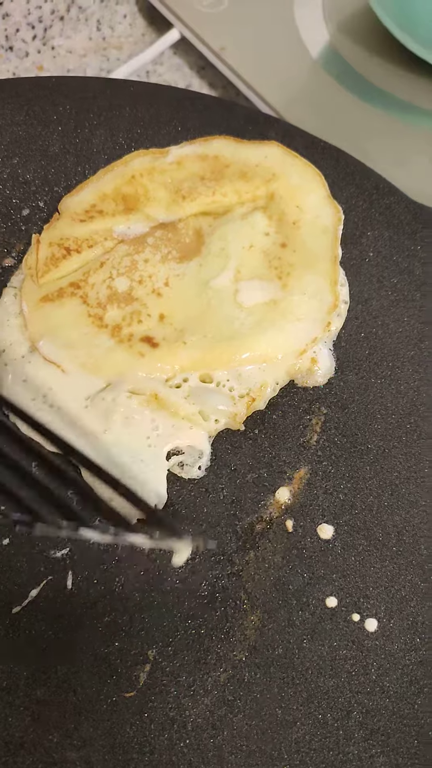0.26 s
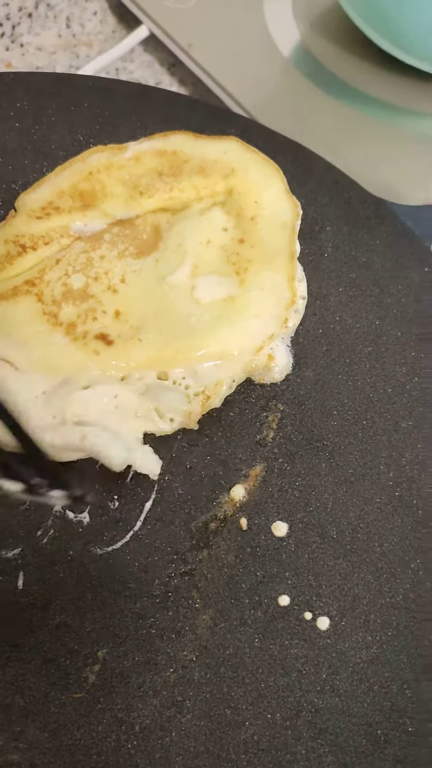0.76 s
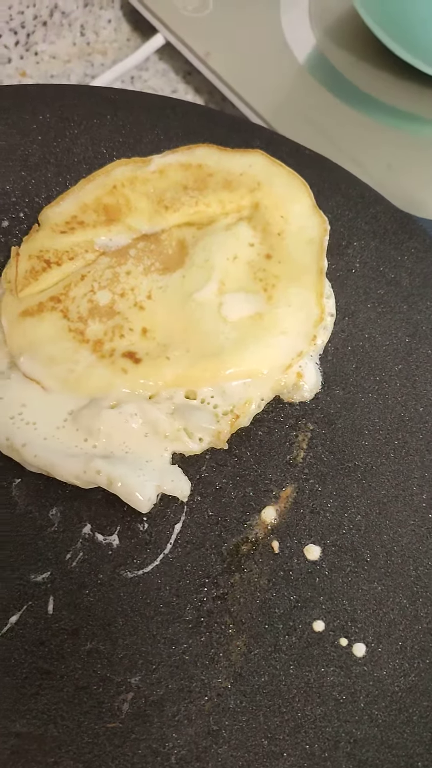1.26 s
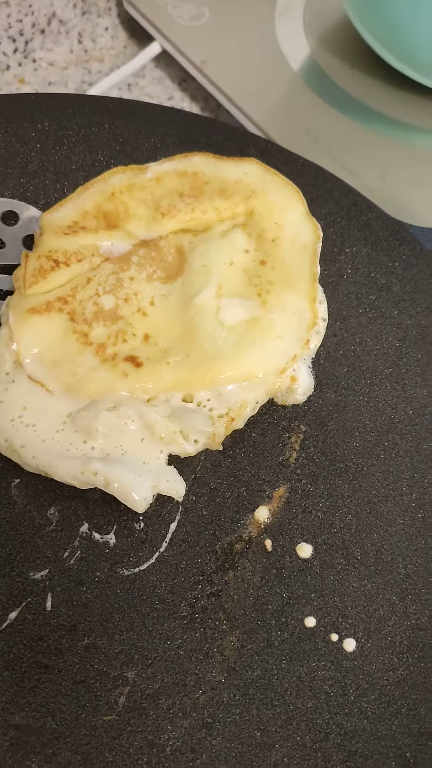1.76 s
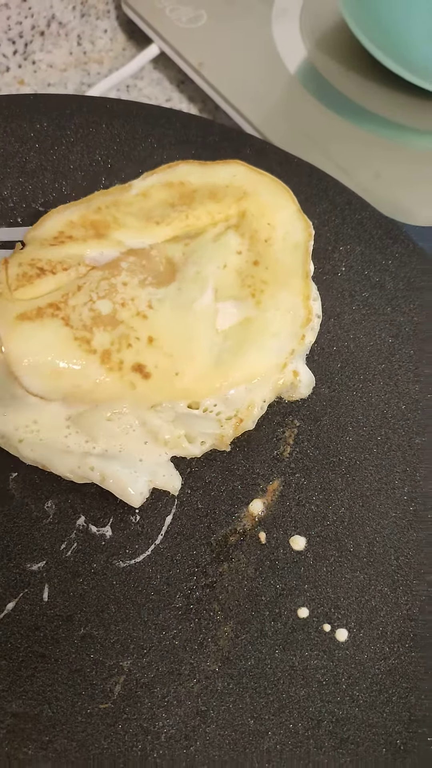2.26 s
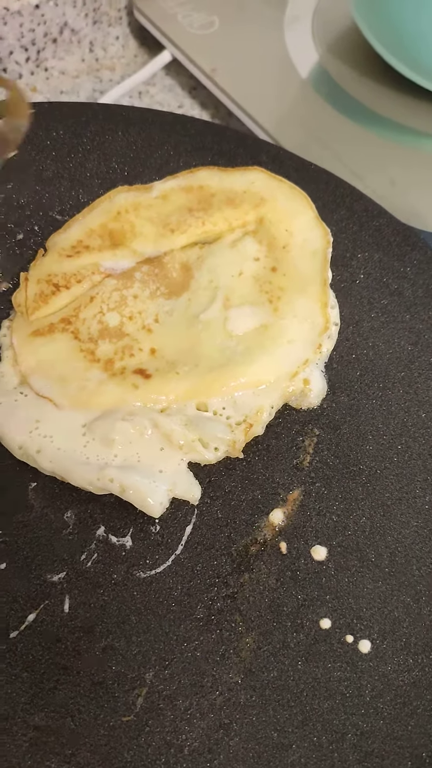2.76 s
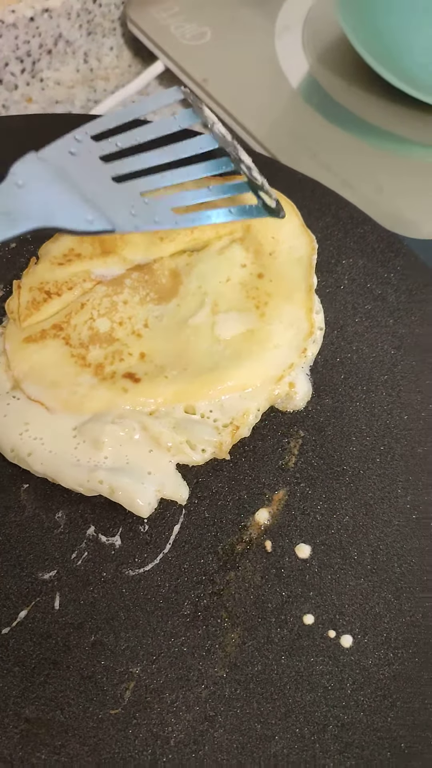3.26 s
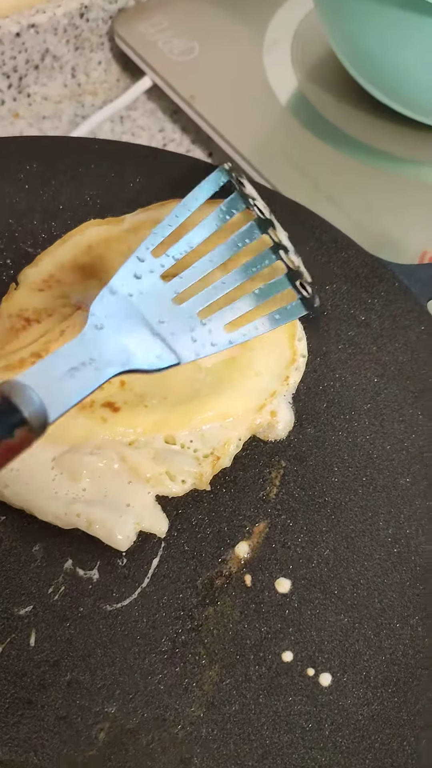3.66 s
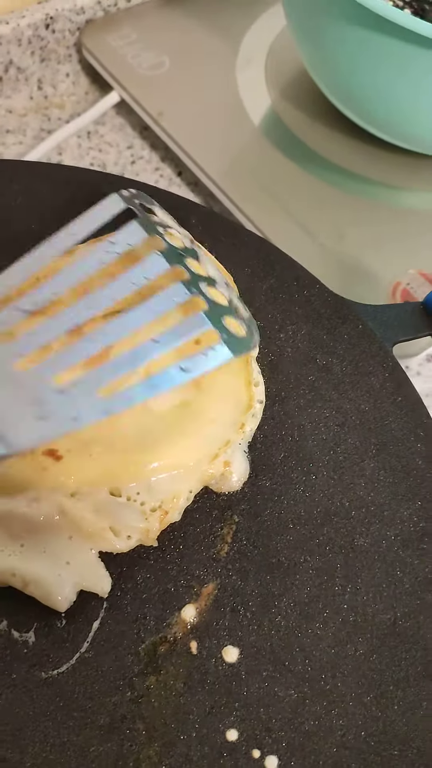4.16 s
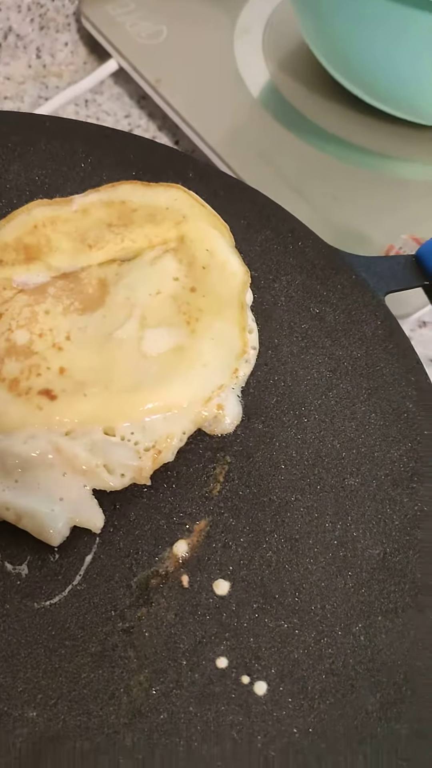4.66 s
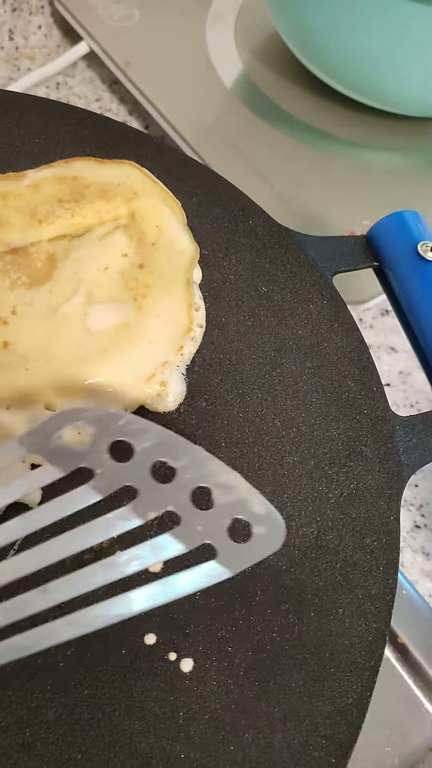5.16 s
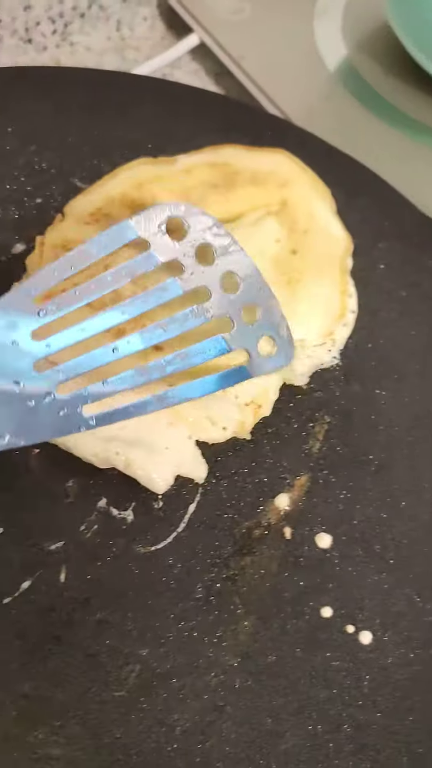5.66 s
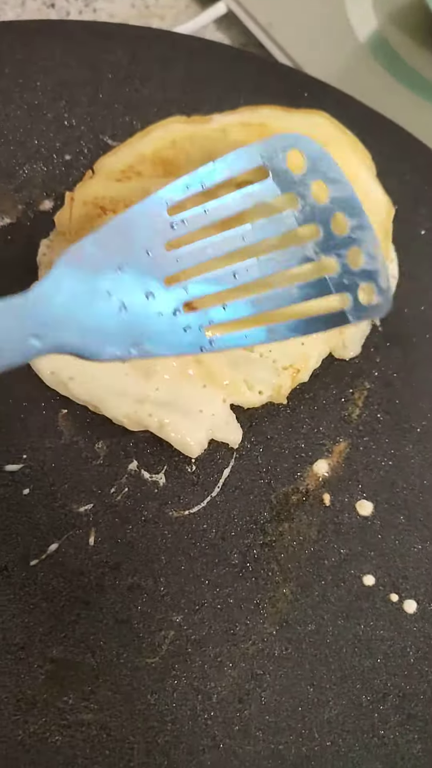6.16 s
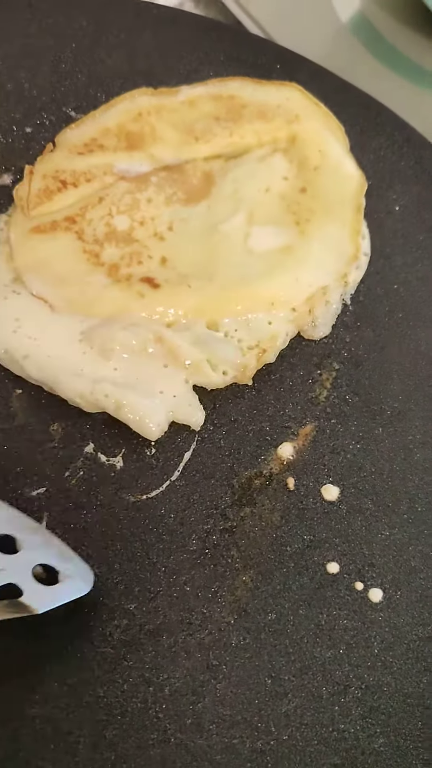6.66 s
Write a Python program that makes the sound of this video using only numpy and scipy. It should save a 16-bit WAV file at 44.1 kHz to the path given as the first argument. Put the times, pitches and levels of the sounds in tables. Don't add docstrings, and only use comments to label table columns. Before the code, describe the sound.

A small kitchen, heard very close in stereo, with a low soft rumble behind. Batter sizzles in a flat pan: a bright, airy hiss, strongest in the first three seconds, scattered throughout with sharp steam pops and thin fat spits, many leaning right. A brief spatula scrape opens; at 0.46 s a hard cracking knock runs into a short scrape at 0.55. Faint rubbing passes around 1.3-2.1 s, with a brisk cluster of spits near 0.9-1.2. A faint knock at 2.47 leads to small scratches until 2.7. Pops stay busy to 3.6 as the hiss thins. Two loud, flat steel clanks ring briefly at 3.73 and 4.06. After quieter crackling, light metallic taps come at 5.43, 5.95 and 6.21, with a quick double brushing stroke around 5.6. A dry knock at 6.77 and short scrape at 6.88 end it as the sizzle flares sharply.

```python
import sys
import numpy as np
from scipy import signal
from scipy.io import wavfile
from scipy.ndimage import uniform_filter1d

SR = 44100
rng = np.random.default_rng(int(sys.argv[2]) if len(sys.argv) > 2 else 0)


def rack_gain(trim_db):
    fader = np.asarray(trim_db, float)
    return 10 ** (fader / 20)


def materialize(psi):
    bounded = np.clip(np.atleast_2d(psi).T, -1, 1)
    quanta = np.round(bounded * 32767).astype(np.int16)
    wavfile.write(sys.argv[1], SR, quanta)


N = 304279
SIDES = np.array([[.5], [-.5]])
STEADY_TOP_HZ = 14350

# (time [s], hiss level [dB])
FRY_VIGOUR = [(0.0, -50), (0.42, -55), (0.5, -51), (0.77, -49), (0.96, -54.5), (2.04, -53), (2.25, -56.5),
              (2.86, -54), (3.57, -58.5), (4.42, -62.5), (4.75, -59), (4.96, -62.5), (5.2, -60.5),
              (6.07, -64.5), (6.47, -65), (6.78, -66), (6.83, -54.5), (6.9, -47)]
# (frequency [Hz], density [dB per Hz])
HISS_SPECTRUM = [(530, -36), (900, -5.5), (1300, -15), (1680, -5.5), (2000, -4.5), (2960, -4), (3450, 0),
                 (4550, -5), (7570, 1.5), (9540, -13), (12700, -3.5), (14300, -8)]


def fry():
    hiss_db, = in_time(FRY_VIGOUR)
    mean_hiss_db = -63
    top_db = 1.45 + 0.23 * (hiss_db - mean_hiss_db)
    clicks = grains(300 * rack_gain(4.5 * drift(6)), spread_db=0.5)
    burst = signal.lfilter([1], [1, -.93], np.abs(clicks))
    white = rng.standard_normal((2, 2, N)) * (1.0 + 0.5 * rms_one(burst)) * rack_gain(1.9 * drift(45))
    return rack_gain(hiss_db - 2) * coloured(white, HISS_SPECTRUM, 912, count=13, patchy_db=1.5, top_db=top_db)


# (time [s], peak level [dB], left-right [dB])
STEAM_POPS = [(0.415, -32, -4.5), (1.0064, -27, 2), (1.5452, -27.5, -3), (1.7427, -29, 0), (1.801, -43, 23),
              (1.9164, -43, 8), (2.0692, -27, -4.5), (2.2928, -30, 2), (2.351, -27, 0), (2.7666, -25.5, 3),
              (2.8605, -34, 4), (2.8875, -27, -2), (2.9452, -25.5, -7), (3.0899, -33, 0), (3.1392, -32, 6),
              (3.2274, -30, -1.5), (3.327, -25.5, -2), (3.3664, -32.5, -4.0), (3.4353, -29, -2),
              (3.5905, -32.5, -6), (3.8172, -33, -11), (4.0133, -34, -9), (4.114, -28, -11),
              (4.2707, -32, -9), (4.4067, -28, 3), (4.4996, -29.5, 2), (4.9305, -30.5, 4),
              (5.238, -29, -3.5), (5.2695, -30, -8), (5.306, -31, -1.5)]
# (time [s], peak level [dB], left-right [dB])
FAT_SPITS = [(0.2272, -31.5, -7), (0.8033, -29, -7.0), (0.8978, -24.5, -9), (0.9376, -28, -7.5),
             (0.9532, -27.5, -6.5), (0.9818, -26.5, -8), (1.2007, -22.5, -5.5), (1.2306, -33, -12),
             (1.378, -29, -5.0), (1.6586, -26.5, -4), (1.6846, -28.5, -6), (2.09, -29.5, -6),
             (2.6724, -33, -3), (3.918, -23, -9), (3.9614, -39, -33), (4.337, -24.5, -7.5),
             (4.4416, -35, -4.0), (4.8217, -31, -4), (4.9915, -31, 0), (5.1741, -36, -4.5),
             (5.8817, -26.5, -3.0), (6.0003, -38, -7), (6.014, -34, -2.5), (6.1659, -33, -3.5),
             (6.3189, -29, -5), (6.4, -36.5, -9), (6.5176, -37.5, -2), (6.6892, -31.5, -6.5),
             (6.831, -36, -15), (6.8761, -29, -11)]


def bursts():
    faint_count, snap_trim_db = 30, 4.5
    chance = rng.standard_normal((faint_count, 2))
    moments = rng.random(faint_count) * N / SR
    faint = [(s, -41 + 4.0 * a, -12, -7 + 4 * b) for s, (a, b) in zip(moments, chance)]
    steam = [(s, db + snap_trim_db, -12, pan) for s, db, pan in STEAM_POPS]
    fat = [(s, db + snap_trim_db, -21, pan) for s, db, pan in FAT_SPITS]
    slaps = [(s, db - 16, 10, -4) for s, db, *_ in LIGHT_TAPS + FLAT_CLANKS]
    return faint + steam + fat + slaps


def pops():
    bright, body = np.zeros((2, 2, N + 999))
    t, rows = np.arange(900) / SR, bursts()
    noise, lasting = rng.standard_normal((len(rows), 3, 900)), rng.random((len(rows), 2))
    for (s, peak_db, body_db, pan_db), (both, *own), (long, full) in zip(rows, noise, lasting):
        shape = np.exp(-t / (0.0001 + 0.0003 * long)) + 0.07 * np.exp(-t / 0.016)
        spit = shape * (0.24 * both + .5 * np.array(own))
        steepest = np.abs(np.diff(spit.mean(0))).max()
        spit = rack_gain(peak_db + SIDES * pan_db) * spit / steepest
        at = round((s + 0.001006) * SR)
        bright[:, at:at + 900] += spit
        body[:, at:at + 900] += spit * rack_gain(body_db + 9 + 3.0 * (2 * full - 1))
    return (band(bright, 3670, 16400) + band(body, 860, 6200))[:, :N]


# (time [s], peak [dB], low modes [dB], high modes [dB], crack [dB])
FLAT_CLANKS = [
    (3.725, -19.5, 3.5, -4.5, -24),
    (4.061, -16, 1.5, 1.4, 12),
]
# (frequency [Hz], level [dB], t60 [s])
STRUCK_MODES = [(298, -46, 0.9), (377, -19.5, 0.34), (406.4, -37, 0.84), (464, -50, 0.05),
                (512.5, -19, 0.24), (680, -7.5, 0.036), (783, -19, 0.079), (1060, -2, 0.028),
                (1353, -16.5, 0.13), (1830, -63, 0.077), (1918, 4, 0.049), (2144, 2.5, 0.055),
                (2565, -18, 0.27), (2600, -42, 0.12), (3189, -6, 0.08), (3903, -12.5, 0.17),
                (3900, -44, 0.16), (4673, -4.5, 0.037), (5600, -12.5, 0.06), (6940, -42, 0.054)]


def clanks():
    hit = blows(FLAT_CLANKS, STRUCK_MODES, trim_db=-10, chatter_s=0.0048, rasp_hz=(400, 5000), hardness=1.29)
    hit += clatter(FLAT_CLANKS, level_db=-20, t60=0.29, low_hz=450, high_hz=5500)
    return hit + clatter(FLAT_CLANKS, level_db=-15.5, t60=0.37, low_hz=294, high_hz=1280)


# (time [s], peak [dB], low modes [dB], high modes [dB], crack [dB])
LIGHT_TAPS = [
    (5.431, -27, -6, 1.7, 3.6),
    (5.951, -34, -5, 2.2, 1.9),
    (6.206, -30, -2.5, 3.9, 3.6),
]
# (frequency [Hz], level [dB], t60 [s])
FREE_MODES = [(355, -21, .12), (497, -18, .07), (716, -14, .06), (1100, -16, .06), (1335, -21, .07),
              (2170, -14, .05), (2740, -10, .05), (2980, -11, .05), (3210, -9, .09), (3520, -14, .05),
              (3950, -16, .09), (4700, -13, .05), (5658, -10, .07), (6680, -16, .05), (6950, -18, .05),
              (7360, -20, .05), (7740, -17, .06), (8870, -24, .05)]


def taps():
    hit = blows(LIGHT_TAPS, FREE_MODES, trim_db=-5.5, chatter_s=0.0065, rasp_hz=(1500, 9000), hardness=0.99)
    return hit + clatter(LIGHT_TAPS, level_db=-10, t60=0.13, low_hz=490, high_hz=7600)


# (middle [s], length [s], level [dB], low modes [dB], rasp [dB])
CRUST_SWEEPS = [
    (5.585, 0.081, -44.5, 6.5, 3.7),
    (5.637, 0.093, -41, 7.5, 6.9),
]


def sweep():
    return drag(CRUST_SWEEPS, FREE_MODES, trim_db=-18.5, high_db=4.5, per_s=4500, rasp_hz=(600, 7500),
                damping=2.4, stutter_db=1.5, grit_db=22.0)


# (time [s], peak [dB], low modes [dB], high modes [dB], crack [dB])
PRESSED_KNOCKS = [
    (.4635, -23, 0.5, -10, 19),
    (2.468, -35.5, -0.5, 23, -5),
    (6.767, -30.5, -13.5, -2, 1.5),
]
# (frequency [Hz], level [dB], t60 [s])
PRESSED_MODES = [(355, -15, .12), (500, -13, .05), (660, -2.5, .04), (790, -6, .05), (1000, -15, .025),
                 (1770, -14, .04), (1950, -7, .03), (2170, 0, .045), (2350, -2, .04), (2810, -8, .04),
                 (3000, -8, .04), (3560, -19, .025), (3970, -22, .025), (4810, -25, .02)]


def knocks():
    return blows(PRESSED_KNOCKS, PRESSED_MODES, trim_db=-13, chatter_s=0.017, rasp_hz=(1700, 3500),
                 hardness=1.0)


# (middle [s], length [s], level [dB], low modes [dB], rasp [dB])
EDGE_SCRAPES = [(.045, 0.091, -44.5, 5, 12), (.548, 0.061, -31, -6, -7), (1.33, 0.14, -60, 1.5, -10),
                (1.49, 0.17, -45.5, -4, 6), (1.75, 0.29, -72, 16.5, -3), (1.95, 0.15, -56.5, -2, -11),
                (2.06, .12, -67, 11, -12), (2.55, 0.085, -62, 16.5, 22), (2.625, 0.087, -49, -1, 19.5),
                (2.68, 0.042, -39, -13.5, -17), (5.17, 0.076, -60, -2, 2), (6.88, 0.088, -43.5, -7, -8)]


def scrapes():
    return drag(EDGE_SCRAPES, PRESSED_MODES, trim_db=-25, high_db=12.0, per_s=2200, rasp_hz=(1900, 3400),
                damping=0.7, stutter_db=3.5, grit_db=23.0)


def blows(table, modes, trim_db, chatter_s, rasp_hz, hardness):
    force, t = np.zeros(N + 2000), np.arange(2000) / SR
    chatter = rng.standard_normal((len(table), 2000)) * 0.13 * np.exp(-t / chatter_s)
    for (s, peak_db, *_), rattle in zip(table, chatter):
        at = round((s + 0.001028) * SR)
        force[at:at + 2000] += rack_gain(peak_db + trim_db) * (rattle + hardness * (t == 0))
    _, low_db, high_db, crack_db = in_time(table)
    return steel(modes, force[:N], low_db, high_db, crack_db - 9, rasp_hz)


def drag(strokes, modes, trim_db, high_db, per_s, rasp_hz, damping, stutter_db, grit_db):
    s, pressure = np.arange(N) / SR, 0
    for middle, length, db, *_ in strokes:
        off = np.clip(2 * (s - middle) / length, -5, 5)
        squareness = np.where(off > 0, 2.6, 2.0)
        pressure = pressure + rack_gain(db - 12 * np.abs(off) ** squareness)
    *_, low_db, rasp_db = in_time(strokes)
    force = grains(per_s * rack_gain(stutter_db * drift(50)), spread_db=4.0) * pressure * rack_gain(trim_db)
    held = [(hz, db, t60 / damping) for hz, db, t60 in modes]
    grit = uniform_filter1d(np.abs(force), size=40) * rng.standard_normal((2, N))
    grit = grit * rack_gain(grit_db + SIDES * -5.0)
    return steel(held, force, low_db, high_db, rasp_db + 6, rasp_hz) + band(grit, 2700, 14000)


def steel(modes, force, low_db, high_db, rasp_db, rasp_hz):
    low, high = force * rack_gain(low_db), force * rack_gain(high_db)
    out = 0
    for hz, db, t60 in modes:
        drive = low if hz < 1500 else high if hz > 3400 else force
        out = out + mode(rack_gain(db) * drive, hz, t60)
    smear = rng.standard_normal((2, 400)) * np.exp(-np.arange(400) / 34.0)
    rasp = signal.oaconvolve((force * rack_gain(rasp_db))[None], smear, axes=1)[:, :N]
    return out + rack_gain(SIDES * -9.0) * band(rasp, *rasp_hz)


def clatter(table, level_db, t60, low_hz, high_hz):
    out, t = np.zeros((2, N + 9000)), np.arange(9000) / SR
    noise = rng.standard_normal((len(table), 3, 9000))
    for (s, peak_db, *_), (both, *own) in zip(table, noise):
        at = round((s + .0012) * SR)
        decay = rack_gain(peak_db + level_db - 60 * t / t60)
        out[:, at:at + 9000] += decay * (both + 0.31 * np.array(own))
    return rack_gain(SIDES * -6.0) * band(out, low_hz, high_hz)[:, :N]


# (frequency [Hz], left-right [dB])
PORT_PAN = [(200, 1), (380, 1), (700, 4), (1290, -4), (1900, -13), (2600, -11), (4400, -8), (8000, -6)]
# (frequency [Hz], left lead [rad])
PORT_LEAD = [(200, 0.21), (700, 1.95), (1300, 1.26), (2000, 2.49), (3000, 1.07), (5000, 1.3), (8000, 2.6)]


def mode(drive, hz, t60):
    r, w = rack_gain(-60 / (t60 * SR)), 2 * np.pi * hz / SR
    poles = [1, -2 * r * np.cos(w), r * r]
    lead = SIDES[:, 0] * at_hz(PORT_LEAD, hz)
    ears = [signal.lfilter([np.sin(p), r * np.sin(w - p)], poles, drive + 1e-18) for p in lead]
    return rack_gain(SIDES * at_hz(PORT_PAN, hz)) * ears


# (time [s], blade ring level [dB], pan hum level [dB])
LONG_RINGS = [
    (0.028, -56, -63),
    (0.465, -48, -57),
    (0.564, -43.5, -60),
    (2.47, -80, -64),
    (3.725, -36.5, -49.5),
    (4.065, -34.5, -48.5),
    (5.436, -64, -56),
    (5.633, -41.5, -60),
    (5.953, -53, -71),
    (6.209, -57.5, -63.5),
]


def rings():
    blade, pan = np.zeros((2, N))
    s, blade_db, pan_db = np.transpose(LONG_RINGS)
    at = (s * SR).astype(int)
    blade[at], pan[at] = rack_gain(blade_db), rack_gain(pan_db)
    blade_ring = band(mode(blade, hz=1906.5, t60=0.66), 1500, 2400)
    return blade_ring + band(mode(pan, hz=196.5, t60=0.9), 140, 280)


def spatula():
    contacts = band(clanks() + taps() + knocks() + scrapes() + sweep(), 230, 14000)
    return contacts + rack_gain(-18) * walls(band(contacts, 410, 1500), t60=0.39) + rings()


def walls(x, t60):
    t = np.arange(SR // 2) / SR
    tail = rng.standard_normal((2, len(t))) * rack_gain(-60 * t / t60) * (t > .004)
    tail = band(tail, 227, 6600)
    tail = tail / np.sqrt(np.sum(tail ** 2) / 2)
    return signal.fftconvolve(x.mean(0, keepdims=True), tail, axes=1)[:, :N]


# (frequency [Hz], density [dB per Hz])
ROOM_SPECTRUM = [(35, -29), (60, 5.5), (97, -3.5), (206, -3.5), (273, -15.5), (345, -6.5), (586, -14.5),
                 (788, -8), (893, -18), (1320, -7.5), (1690, -28.5), (1890, -12), (2500, -10.5),
                 (3250, -47), (5500, -120)]


def room():
    white = rng.standard_normal((2, 2, N))
    return rack_gain(-67) * coloured(white, ROOM_SPECTRUM, 55.6, count=17, patchy_db=2.2)


def rumble():
    shake = band(rng.standard_normal(N) + .2 * rng.standard_normal((2, N)), 11, 40)
    low_pass = signal.butter(4, 46, fs=SR, output="sos")
    return rack_gain(-59 + 1.5 * drift(1.2)) * rms_one(signal.sosfilt(low_pass, shake))


# (frequency [Hz], left-right [dB])
AIR_LEAN = [(60, -9), (110, 6.5), (200, -2.5), (380, -2), (700, 4), (1290, 0.5), (2380, -4.5), (4400, -4),
            (8120, -3.5), (15000, -7.5)]
# (frequency [Hz], correlation [-])
PORT_LIKENESS = [(60, 0.55), (130, 1), (290, 0.48), (640, 0.71), (1410, 0.36), (3100, 0.1), (6810, -0.01),
                 (15000, -1.17)]


def coloured(white, spectrum, low_hz, count, patchy_db, top_db=0):
    out, edges = 0, low_hz * 2 ** (np.arange(count + 1) / 3)
    for k, (low, high) in enumerate(zip(edges, edges[1:])):
        mid, side = band(white[k % 2], low, high)
        hz = np.sqrt(low * high)
        alike = np.clip(at_hz(PORT_LIKENESS, hz), 0, 1)
        level_db = at_hz(spectrum, hz) + patchy_db * drift(14) + top_db * (hz > 9000)
        gain = rack_gain(level_db + SIDES * at_hz(AIR_LEAN, hz))
        out = out + gain * (np.sqrt(1 + alike) * mid + np.sqrt(1 - alike) * side * 2 * SIDES)
    return out / np.median(np.abs(out.mean(0)))


def grains(per_s, spread_db):
    sizes = rack_gain(spread_db * np.minimum(rng.exponential(1, N), 4)) * rng.choice([-1, 1], N)
    return rms_one(sizes * (rng.random(N) < per_s / SR))


def drift(rate):
    r = np.exp(-80 * np.pi * rate / SR)
    slow = signal.lfilter([1], [1, -2 * r, r * r], rng.standard_normal(N // 40 + 2002))[2000:]
    return np.interp(np.arange(N) / 40, np.arange(len(slow)), rms_one(slow))


def rms_one(x):
    return x / np.sqrt(np.mean(x ** 2) + 1e-20)


def in_time(rows):
    s, *columns = np.transpose(rows)
    return [np.interp(np.arange(N) / SR, s, c) for c in columns]


def at_hz(points, hz):
    table_hz, values = np.transpose(points)
    return np.interp(np.log(hz), np.log(table_hz), values)


def band(x, low_hz, high_hz):
    sos = signal.butter(2, [low_hz, min(high_hz, .45 * SR)], "band", fs=SR, output="sos")
    return signal.sosfilt(sos, x)


def top_cut(x):
    return signal.sosfilt(signal.cheby2(16, 60, STEADY_TOP_HZ + 330, fs=SR, output="sos"), x)


def scene():
    blade = spatula()
    steady = fry() + blade + rack_gain(-15) * walls(blade, t60=0.24) + room() + rumble()
    snaps = pops()
    high_pass = signal.cheby2(10, 50, STEADY_TOP_HZ - 500, "high", fs=SR, output="sos")
    over = signal.sosfilt(high_pass, snaps)
    return top_cut(steady) + top_cut(snaps) + rack_gain(-13) * over


def band_limit(x):
    return signal.sosfilt(signal.butter(12, 15590, fs=SR, output="sos"), x)


def record(dry):
    hz, width_hz, lift_db = 7530, 490, 6.63
    r = np.exp(-np.pi * width_hz / SR)
    zeros = np.array([1, 0, -1]) * (1 - r * r) / 2
    poles = [1, -2 * r * np.cos(2 * np.pi * hz / SR), r * r]
    peak = signal.lfilter(zeros, poles, dry)
    mix = dry + (rack_gain(lift_db) - 1) * peak
    return band_limit(mix)


dry = scene()
out = record(dry)
materialize(out)
```